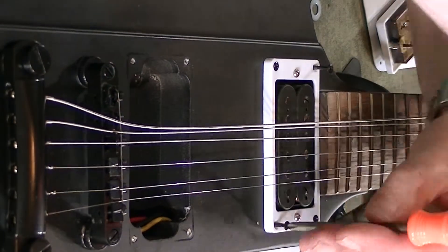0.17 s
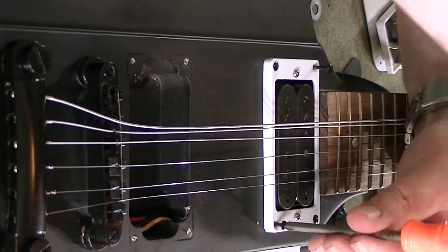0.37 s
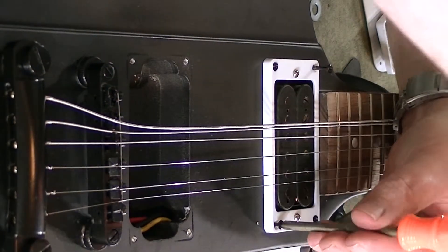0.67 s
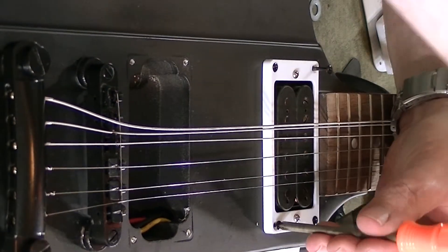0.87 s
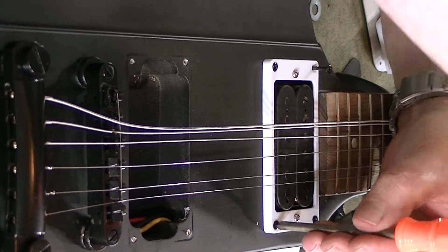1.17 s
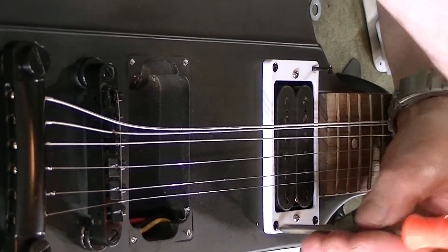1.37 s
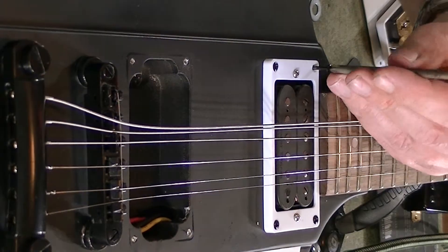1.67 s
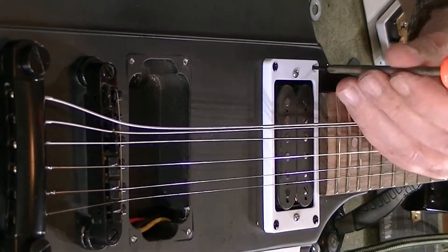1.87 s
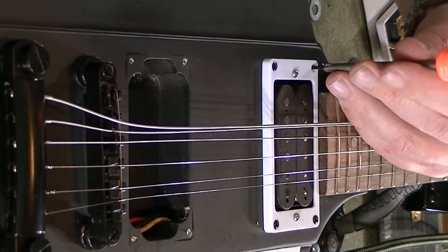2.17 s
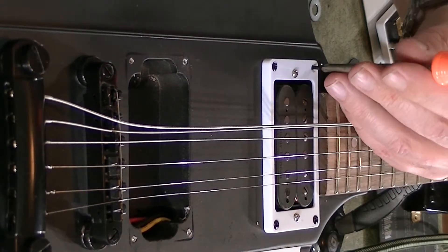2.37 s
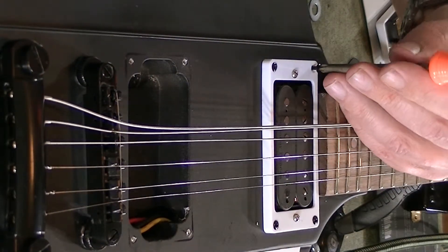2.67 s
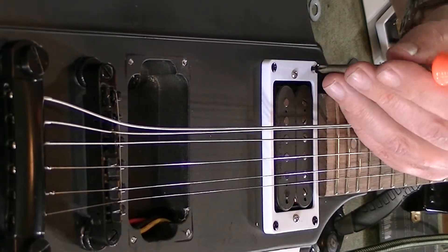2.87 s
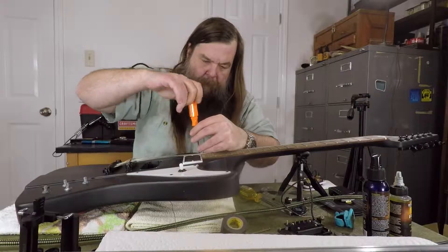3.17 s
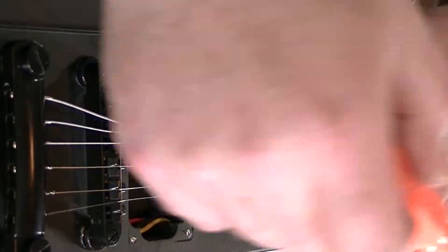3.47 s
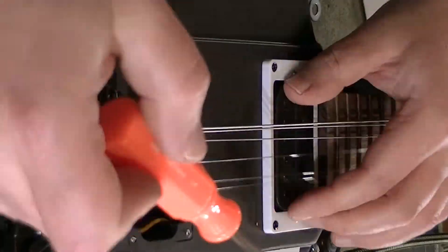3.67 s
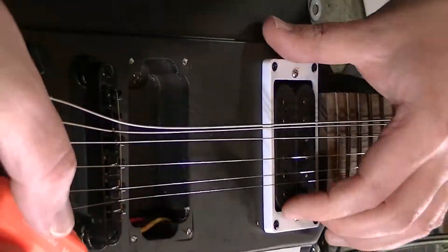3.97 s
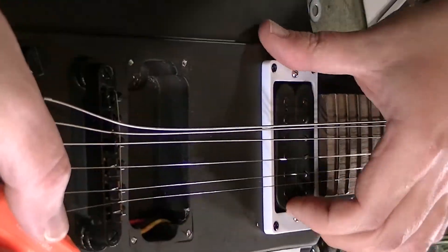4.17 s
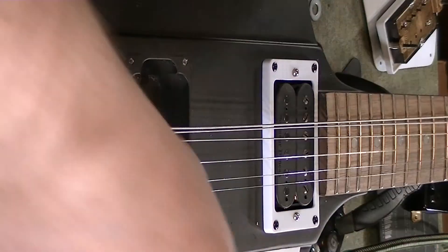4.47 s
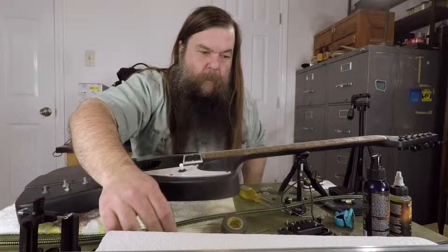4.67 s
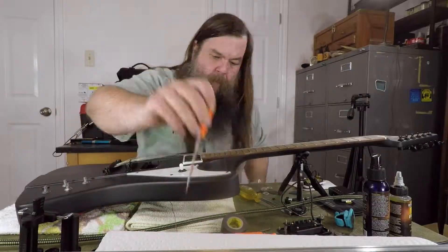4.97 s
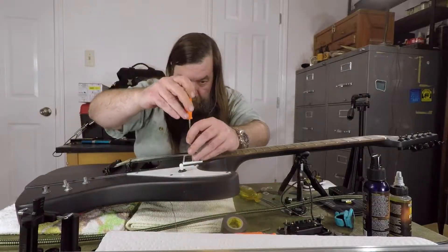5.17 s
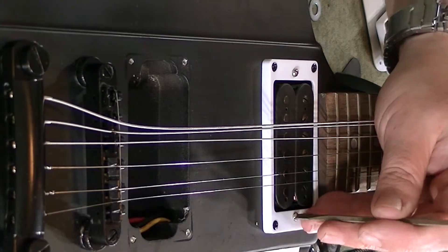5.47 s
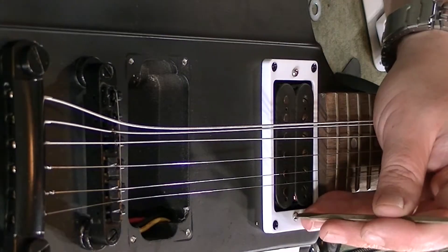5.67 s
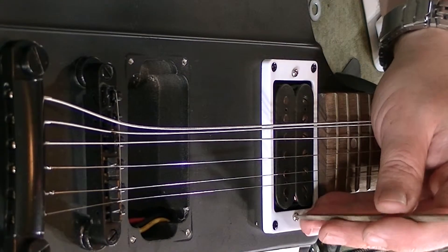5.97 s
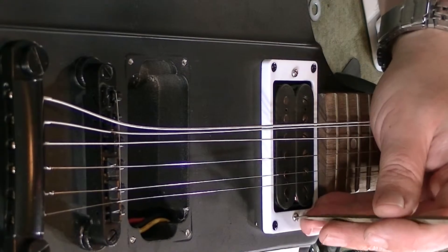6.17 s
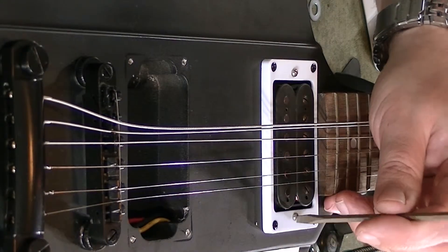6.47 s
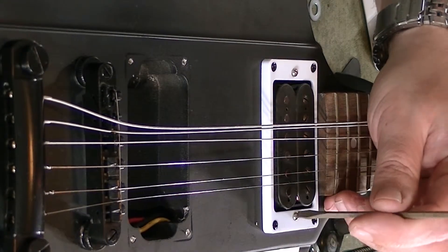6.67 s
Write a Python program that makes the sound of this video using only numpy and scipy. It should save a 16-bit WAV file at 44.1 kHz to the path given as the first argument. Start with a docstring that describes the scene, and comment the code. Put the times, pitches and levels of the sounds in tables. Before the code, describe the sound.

In a small, quiet workshop, a hand screwdriver turns small screws into a guitar body, giving short woody creaks with a light plastic edge. A vehicle drones past outside, strongest around two seconds. A sharp snap comes at three seconds, the creaks stop, and the tool drags and knocks loudly on the bench near five. Faint taps and rustles follow over hum, close to the microphone.

```python
"""A hand screwdriver creaks small screws into a guitar body in a quiet workshop: each slip of the thread is a
burst of friction noise ringing wood and plastic, with fine grit, finger taps, rustles and one sharp snap. The
tool is then laid down: filtered noise and dense grains drag and knock on the bench. Thin ticks sound now and
then throughout. An engine drones past outside during the first half, as sine orders of its firing pitch over
road noise. Mains hum and filtered room hiss lie underneath."""
import sys
import numpy as np
from scipy import signal
from scipy.fft import rfft, irfft
from scipy.io import wavfile
from scipy.ndimage import map_coordinates

SR = 44100
rng = np.random.default_rng(int(sys.argv[2]) if len(sys.argv) > 2 else 0)


def int16_out(signal):
    """Quantize to a 16-bit WAV file."""
    q = np.round(np.clip(np.atleast_2d(signal).T, -1, 1) * 32767)
    wavfile.write(sys.argv[1], SR, q.astype(np.int16))


N = 300321
TIME = np.arange(N) / SR  # seconds

# Ring modes of the wooden guitar body. Each row: pitch in Hz, relative level in dB, t60 in seconds.
BODY_MODES = [(396, -17, 0.088), (490, -8, 0.042), (613, -10.5, 0.072), (720, -3.5, 0.023), (904, 1, 0.019),
              (954, -19, 0.052), (1223, -9.5, 0.027)]
# Ring modes of the plastic pickup. Each row: pitch in Hz, relative level in dB, t60 in seconds.
PLASTIC_MODES = [(1554, 5, 0.02), (1729, 11, 0.024), (2130, -2.5, 0.025), (2570, -24.5, 0.12)]


def from_db(db):
    """Gain of a level in dB."""
    return 10 ** (np.asarray(db) / 20)


def rms_one(x):
    """Scale to rms 1."""
    return x / np.sqrt(np.mean(x ** 2) + 1e-20)


def in_time(rows):
    """Draw the columns of a curve table sample by sample, in straight lines between its times."""
    seconds, *columns = np.transpose(rows)
    return [np.interp(TIME, seconds, column) for column in columns]


def coloured(x, spectrum):
    """Weight x by a spectrum drawn over log frequency, then scale to rms 1."""
    hz, level_db = np.transpose(spectrum)
    log_bins = np.log(np.fft.rfftfreq(N, 1 / SR) + 1)
    gain = from_db(np.interp(log_bins, np.log(hz), level_db))
    return rms_one(irfft(rfft(x) * gain, N))


def drift(rate):
    """Smooth random wander about zero, through rate random knots a second of spread 1."""
    knots = rng.standard_normal(400)
    return map_coordinates(knots, [TIME * rate], order=3)


def grains(per_s, spread_db):
    """Random clicks of uneven size and either sign."""
    size_db = spread_db * np.minimum(rng.exponential(1, N), 4)
    size = from_db(size_db) * rng.choice([-1, 1], N)
    return size * (rng.random(N) < per_s / SR)


def ring(x, hz, t60):
    """Two-pole resonator: a unit click sets a decaying sine of height about 1 ringing."""
    radius = from_db(-60 / (t60 * SR))
    angle = 2 * np.pi * hz / SR
    return signal.lfilter([0, np.sin(angle)], [1, -2 * radius * np.cos(angle), radius * radius], x)


def add(out, s, sound):
    """Mix a sound in at time s."""
    at = round(s * SR)
    out[at:at + len(sound)] += sound[:N - at]


def slip_noise(length):
    """A burst of rough friction that swells and dies away, with a decay constant of length seconds."""
    t = np.arange(8000) / SR / np.clip(length, .0005, .04)
    return rng.standard_normal(len(t)) * (1 - np.exp(-0.8 * t)) * np.exp(-t)


def struck(slip, modes, low_hz, high_hz, scuff):
    """One slip drives every mode with its own strength and a pitch that shifts with the grip; peak 1."""
    strengths, shifts = rng.normal(0, 1, (2, len(modes)))
    rings = sum(from_db(db + 2.5 * strength) * ring(slip, hz * (1 + .05 * shift), t60)
                for (hz, db, t60), strength, shift in zip(modes, strengths, shifts))
    band = signal.butter(3, [low_hz, high_hz], "band", fs=SR, output="sos")
    rings = rms_one(signal.sosfilt(band, rings))
    friction = rms_one(signal.sosfilt(band, slip))
    out = rings + scuff * friction  # the scuff itself is heard too
    return out / np.abs(out).max()


def room_tone():
    """Mains harmonics that waver a little, over steady hiss; both levels step from stretch to stretch."""
    # Mains harmonics. Each row: pitch in Hz, rms level in dB before the stretch changes.
    harmonics = [(180, -54.5), (300, -71), (360, -79.5), (480, -85), (660, -85)]
    # Hiss colour. Each row: frequency in Hz, relative level in dB.
    hiss_colour = [(24, -34), (45, 1.5), (120, -9.5), (180, -12), (300, -18), (480, -22), (1200, -28),
                   (4800, -32), (9000, -38), (13800, -42), (15000, -43.5), (16000, -63)]
    # Steps of the room tone. Each row: start in seconds, hum change in dB, hiss change in dB.
    steps = [(0, .5, 1), (1.9, 0, -.5), (2.98, -2.5, -2), (3.45, 1.5, -.5), (4.55, -1, 0), (5.28, 1.5, -.5)]
    base_hiss_db = -57
    starts, hum_db, hiss_db = np.transpose(steps)
    stretch = np.maximum(np.searchsorted(starts, TIME) - 1, 0)
    hum = sum(from_db(db + 0.61 * drift(14.0)) * np.sin(2 * np.pi * (hz * TIME + rng.random()))
              for hz, db in harmonics)
    hiss = coloured(rng.standard_normal(N), hiss_colour)
    return np.sqrt(2) * from_db(hum_db[stretch]) * hum + from_db(base_hiss_db + hiss_db[stretch]) * hiss


def road():
    """Lumpy deep rumble and a duller tyre roar, both noise, swell as the vehicle passes."""
    # Road noise through the walls. Each row: time in seconds, deep rumble in dB, tyre roar in dB.
    swell = [(0.0, -48, -62.5), (0.6, -47, -56), (1.0, -43, -53), (1.4, -50, -53.5), (1.93, -46, -51),
             (2.2, -43.5, -43.5), (2.5, -44, -49), (3.2, -47, -56), (3.5, -56, -64), (4.5, -63, -75),
             (5.12, -52, -66), (5.8, -60, -80), (6.81, -54, -75)]
    # Tyre roar colour. Each row: frequency in Hz, relative level in dB.
    roar_colour = [(60, -18), (100, 1.5), (150, -8), (220, -9), (320, -20.5), (480, -17.5), (700, -22),
                   (1000, -25.5), (1300, -37.5), (2500, -55), (4000, -90)]
    deep_db, roar_db = in_time(swell)
    deep_band = signal.butter(2, [14, 40], "band", fs=SR, output="sos")
    deep = rms_one(signal.sosfilt(deep_band, rng.standard_normal(N)))
    roar = coloured(rng.standard_normal(N), roar_colour)
    return from_db(deep_db) * deep + from_db(roar_db + 2.24 * drift(30.23)) * roar


def engine():
    """Sines at low orders of the firing pitch; only these get through the walls."""
    # The passing engine. Each row: time in seconds, firing pitch in Hz, firing tone in dB rms.
    passing = [(0.0, 90.7, -54), (0.31, 87.4, -53), (0.49, 86.8, -42), (0.74, 86.9, -51), (0.97, 86.7, -41),
               (1.0, 86.9, -47), (1.08, 86.5, -37), (1.25, 88.0, -36), (1.28, 88.4, -48), (1.31, 88.5, -34),
               (1.39, 89.0, -42), (1.62, 90.8, -30), (1.76, 91.0, -28), (1.93, 92.2, -39),
               (2.01, 91.9, -52), (2.1, 88.6, -26), (2.17, 88.3, -20), (2.25, 86.8, -22), (2.38, 84.4, -39),
               (2.42, 83.5, -31), (2.5, 81.3, -37), (2.53, 81.4, -53), (2.56, 81.6, -42), (2.77, 81.3, -46),
               (2.86, 80.3, -41), (2.97, 79.9, -43), (3.08, 86.4, -56), (3.15, 84.0, -47),
               (3.29, 85.1, -60), (3.4, 77.5, -58)]
    # Upper orders. Each row: multiple of the firing pitch, relative level in dB.
    upper_orders = [(1.251, 3.5), (2.4, -1.5), (3, -8), (3.502, -7), (5.3, -8)]
    # Swell as the vehicle nears. Each row: time in seconds, second order in dB, upper orders in dB.
    swell = [(0, -62, -67), (1.0, -56, -66), (1.6, -50, -64.5), (1.85, -46, -58.5), (2.05, -52, -51.5),
             (2.24, -41, -49), (2.36, -54, -63), (2.75, -52, -70), (3.4, -66, -93)]
    flutter_db, flutter_per_s = 5.0, 20.0  # of the second order
    hz, first_db = in_time(passing)
    second_db, upper_db = in_time(swell)
    phase = 2 * np.pi * np.cumsum(hz) / SR
    first = from_db(first_db) * np.sin(phase)
    second = from_db(second_db + flutter_db * drift(flutter_per_s)) * np.sin(2 * phase)
    upper = from_db(upper_db) * sum(from_db(db + 1.8 * drift(13.0)) * np.sin(multiple * phase)
                                    for multiple, db in upper_orders)
    fade_out = np.clip((passing[-1][0] - TIME) / 0.11, 0, 1)
    return np.sqrt(2) * (first + second + upper) * fade_out


def bump():
    """A hand bumps the body: a soft push of a few ms moves only a low ring."""
    # The bump: time in seconds, peak in dB, contact in seconds, ring pitch in Hz, t60 in seconds.
    s, peak_db, contact, hz, t60 = (3.92, -35.5, .003, 200, .03)
    out, t = np.zeros(N), np.arange(4000) / SR
    push = np.sin(np.pi * np.minimum(t / contact, 1)) ** 2
    sound = ring(push, hz, t60)
    add(out, s, from_db(peak_db) * sound / np.abs(sound).max())
    return out


def ticks():
    """Single sharp pulses through a one-pole lowpass that dulls their top."""
    # Thin ticks. Each row: time in seconds, peak in dB.
    pulses = [(2.9803, -28.5), (3.0256, -36.5), (3.0673, -50), (3.448, -42.5), (4.549, -40), (4.592, -42),
              (4.882, -38), (4.888, -40), (4.925, -2.5), (4.967, -34), (5.281, -39.5)]
    out = np.zeros(N)
    for s, peak_db in pulses:
        out[round(s * SR)] = from_db(peak_db)
    return signal.lfilter([1], [1, -.6], out)


def bench():
    """The bench top thumps in its modes and dense grains clatter, held in the drag, dying fast in knocks."""
    # Knocks on the bench. Each row: time in seconds, thump in dB, clatter in dB, t60 in seconds.
    knocks = [(4.703, -26, -32, .074), (4.712, -26.5, -41, .08), (4.881, -38, -53, .026),
              (4.907, -35.5, -48, .16), (4.921, -21, -28, .09), (4.927, -9.5, -20, .06),
              (4.935, -12, -24.5, .04)]
    # Bench top modes. Each row: pitch in Hz, relative level in dB, t60 in seconds.
    top_modes = [(60, -3, .06), (151, -7, 0.06), (226.6, 1.5, 0.12), (412, -2.5, .07), (478, -3, 0.07),
                 (575, -4, 0.08), (787, 4, 0.045)]
    # Colours of thump and clatter. Each row: frequency in Hz, relative level in dB.
    thump_colour = [(18, -33), (30, -8), (131, -6.5), (260, -2.5), (349, -9), (462, -4), (779, -13.5),
                    (1290, -19), (1500, -34.5), (1950, -55), (3300, -120)]
    clatter_colour = [(530, -15), (900, -3), (1230, -11.5), (1990, -4.5), (3340, -6), (3640, -4),
                      (4680, -2.5), (7490, -12.5), (11100, -17), (12600, -25), (16000, -45)]
    # The drag: start in seconds, end in seconds, thump in dB and clatter in dB as it sets off.
    start, end, drag_thump_db, drag_clatter_db = (4.627, 4.70, -50, -47)
    edge_s, thump_gain_db, clatter_loss_db = .01, 9, 7  # along the drag
    knock_rise_s = .0028

    out = np.zeros(N)
    push = coloured(rng.standard_normal(N), thump_colour)
    rings = rms_one(sum(from_db(db) * ring(push, hz, t60) for hz, db, t60 in top_modes))
    thump = rms_one(0.6 * push + rings)
    clatter = coloured(grains(1800., spread_db=3.5), clatter_colour)

    t = np.arange(12000) / SR
    held = np.clip(t / edge_s, 0, 1) * np.clip((end - start - t) / edge_s + 1, 0, 1)
    along = np.minimum(t / (end - start), 1)
    uneven = from_db(3.0 * drift(45.0)[:len(t)])
    drag_low_shape = held * from_db(thump_gain_db * along)
    drag_shape = held * uneven * from_db(-clatter_loss_db * along)
    strokes = [(start, drag_thump_db, drag_clatter_db, drag_low_shape, drag_shape)]
    for s, thump_db, clatter_db, t60 in knocks:
        shape = (1 - np.exp(-t / knock_rise_s)) * from_db(-60 * t / t60)
        strokes.append((s, thump_db, clatter_db, shape, shape))

    for s, thump_db, clatter_db, low_shape, shape in strokes:
        at = rng.integers(N - len(t))
        low, rough = thump[at:at + len(t)], clatter[at:at + len(t)]
        # the level holds for the burst itself
        low = low / np.sqrt(np.sum((shape * low) ** 2) / np.sum(shape ** 2))
        # light contacts are duller
        top_hz = np.clip(5000 * from_db(0.94 * (clatter_db + 44)), 2000, 18000)
        rough = rms_one(signal.sosfilt(signal.butter(2, top_hz, fs=SR, output="sos"), rough))
        # the tool rings as it lies
        tool = rms_one(sum(ring(rough, hz, 0.01) for hz in rng.uniform(1200, 4200, 2)))
        rough = rms_one(rough + 0.5 * tool)
        add(out, s, from_db(thump_db) * low_shape * low + from_db(clatter_db) * shape * rough)
    return out


def touches():
    """Fingers tap parts with short dull rings; skin and steel rustle brightly as friction noise."""
    # Finger taps. Each row: time in seconds, pitch in Hz, peak in dB.
    taps = [(3.59, 905, -58), (3.704, 1030, -62), (3.749, 1340, -57), (3.762, 845, -58), (4.982, 800, -52),
            (4.984, 1200, -54), (5.208, 560, -56), (5.315, 2600, -54), (5.32, 897, -49.5),
            (5.399, 422, -56), (5.51, 400, -58), (5.614, 417, -56), (6.018, 510, -51), (6.02, 800, -56),
            (6.047, 950, -53), (6.268, 400, -56), (6.588, 4780, -49), (6.597, 740, -54), (6.663, 367, -55),
            (6.666, 860, -58), (6.711, 900, -57)]
    # Steel tip and skin rustling over parts. Each row: time in seconds, peak in dB, decay in seconds.
    rustles = [(0.026, -48.5, .007), (0.12, -57, .006), (1.431, -54, .007), (1.558, -49, .009),
               (1.657, -40, .011), (2.892, -55, .005), (3.15, -57, .004), (3.201, -57, .004),
               (3.59, -55, .028), (3.702, -54, .009), (4.982, -54, .012), (5.195, -50, .012),
               (5.312, -42.5, .007), (5.539, -55, .0054), (6.047, -54.5, .006), (6.466, -60, .008),
               (6.587, -44, .011), (6.666, -56, .006), (6.711, -59, .006)]
    # Ring modes of the steel. Each row: pitch in Hz, relative level in dB, t60 in seconds.
    steel_modes = [(3230, 2, 0.0059), (4610, 2, 0.018), (5380, 10, 0.0052), (6710, -2.5, 0.0048),
                   (7700, 3, 0.012), (8686, -1, .008), (10530, -16.5, .006), (13000, -5, .005)]
    out = np.zeros(N)
    for s, hz, peak_db in taps:
        # two resonators in a row soften the attack
        tone = ring(ring(slip_noise(0.0043), hz, t60=.00874), hz, t60=.02052)
        add(out, s, from_db(peak_db) * tone / np.abs(tone).max())
    for s, peak_db, length in rustles:
        rustle = struck(slip_noise(length), PLASTIC_MODES[2:] + steel_modes,
                        low_hz=1860, high_hz=11500, scuff=.8)
        add(out, s, from_db(peak_db) * rustle)
    return out


def snap():
    """The bit snaps into the slot: a hard contact of half a millisecond rings the body briefly."""
    # The snap: time in seconds, peak in dB.
    s, peak_db = (3.0242, -18)
    # Its ring. Each row: pitch in Hz, relative level in dB, t60 in seconds.
    modes = [(446.5, -31, 0.016), (698, 7.5, 0.012), (980, 3, 0.0086), (1735, 6.5, 0.012)]
    out, blow = np.zeros(N), np.zeros(4000)
    blow[:20] = np.hanning(20)
    sound = sum(from_db(db) * ring(blow, hz, t60) for hz, db, t60 in modes)
    add(out, s, from_db(peak_db) * sound / np.abs(sound).max())
    return out


def grit():
    """Single grains crushed in the thread ring briefly at wood and plastic pitches."""
    # Fine grit while the screw turns under load. Each row: time in seconds, grain level in dB.
    level = [(0, -72), (1.5, -62), (2.3, -66), (2.8, -55), (3.2, -59.5), (3.45, -85), (6.81, -85)]
    grains_per_s = 70.  # over all modes together
    modes = BODY_MODES[3:] + PLASTIC_MODES
    rings = sum(ring(grains(grains_per_s / len(modes), spread_db=2.0), hz, t60=0.013) for hz, _, _ in modes)
    return from_db(in_time(level)[0]) * rings


def creaks():
    """Each slip of the thread is a few ms of friction into wood and plastic."""
    # Thread creaks while the screw turns.
    # Each row: time in seconds, wood peak in dB, main pitch in Hz, plastic peak in dB.
    slips = [(0.024, -39, 930, -61), (0.12, -52, 595, -66), (0.273, -50.5, 403, -71),
             (0.511, -43, 420, -68), (0.607, -45, 388, -74), (0.709, -39, 912, -77), (0.769, -49, 413, -66),
             (0.804, -42, 960, -62), (0.898, -39, 853, -55), (0.975, -48, 510, -69), (1.086, -37, 639, -70),
             (1.182, -45, 571, -70), (1.28, -43, 843, -63), (1.373, -47, 610, -71),
             (1.431, -50.5, 503, -66), (1.558, -37, 546, -45), (1.657, -34.5, 523, -43),
             (1.801, -44.5, 605, -73), (2.042, -51, 493, -74), (2.325, -32.5, 708, -42),
             (2.391, -52, 471, -56), (2.418, -38.5, 485, -56), (2.492, -48, 405, -54),
             (2.518, -41, 492, -60), (2.613, -32, 461, -40), (2.677, -52, 763, -53),
             (2.707, -33, 553, -43.5), (2.768, -62, 382, -49), (2.8, -32.5, 865, -48.5),
             (2.863, -46, 486, -54), (2.892, -30, 672, -37.5), (2.95, -53, 425, -52),
             (2.977, -41.5, 970, -53), (3.038, -51, 389, -60), (3.067, -41.5, 860, -72),
             (3.113, -42, 808, -68), (3.163, -35, 982, -46.5), (3.235, -48.5, 445, -76),
             (3.268, -44, 648, -63), (3.32, -50, 700, -81)]
    slip_cycles = 2.9  # a slip's decay constant, in cycles of its pitch
    out = np.zeros(N)
    for s, wood_db, hz, plastic_db in slips:
        slip = slip_noise(slip_cycles / hz)
        wood = struck(slip, BODY_MODES + [(hz, 7, .03)], low_hz=390, high_hz=1400, scuff=.6)
        plastic = struck(slip, PLASTIC_MODES, low_hz=1450, high_hz=2350, scuff=.35)
        add(out, s, from_db(wood_db) * wood)
        add(out, s, from_db(plastic_db) * plastic)
    return out


def workshop(x):
    """Near walls and bench return a short, dull tail of decaying noise."""
    t60_s = 0.066  # seconds
    t = np.arange(round(.25 * SR)) / SR
    tail = rng.standard_normal(len(t)) * from_db(-60 * t / t60_s) * (t > .004)
    tail = signal.lfilter([.4], [1, -.6], tail)
    return signal.fftconvolve(x, tail / np.sqrt(np.sum(tail ** 2)))[:N]


def scene():
    """Everything is heard at one microphone; the background level dips briefly and recovers."""
    # Background dips. Each row: start in seconds, depth in dB, recovery time constant in seconds.
    dips = [(3.452, 8, 0.055), (4.554, 10.5, 0.014), (4.89, 2.5, .02), (5.285, 4.5, 0.01)]
    room_db = -14.5
    dips_db = sum(depth_db * (TIME > s) * np.exp(-np.maximum(TIME - s, 0) / recovery)
                  for s, depth_db, recovery in dips)
    background = from_db(-dips_db) * (engine() + road() + room_tone())
    hands = creaks() + grit() + touches()
    contacts = snap() + bump() + bench() + ticks()
    return (background + hands + from_db(room_db) * workshop(hands) + contacts)[None]


def record(dry):
    """A steep lowpass cuts the top, 50 dB down from 16.5 kHz."""
    return signal.sosfilt(signal.cheby2(10, 50, 16500, fs=SR, output="sos"), dry)


dry = scene()
out = record(dry)
int16_out(out)
```